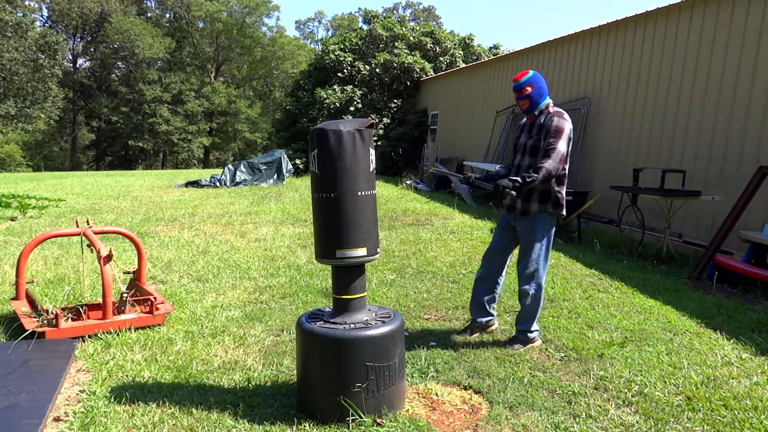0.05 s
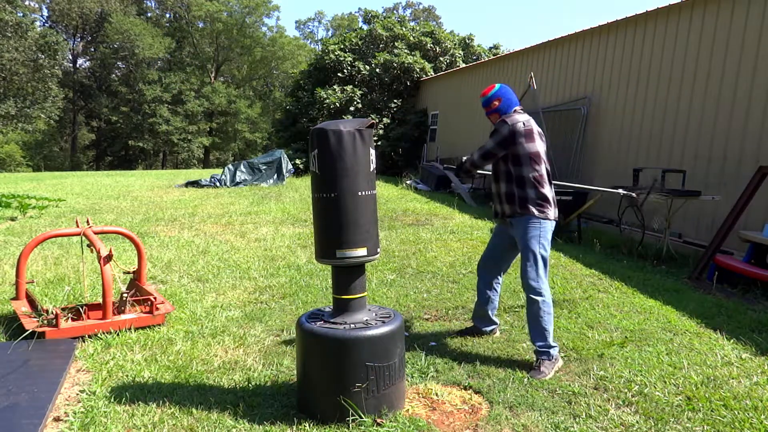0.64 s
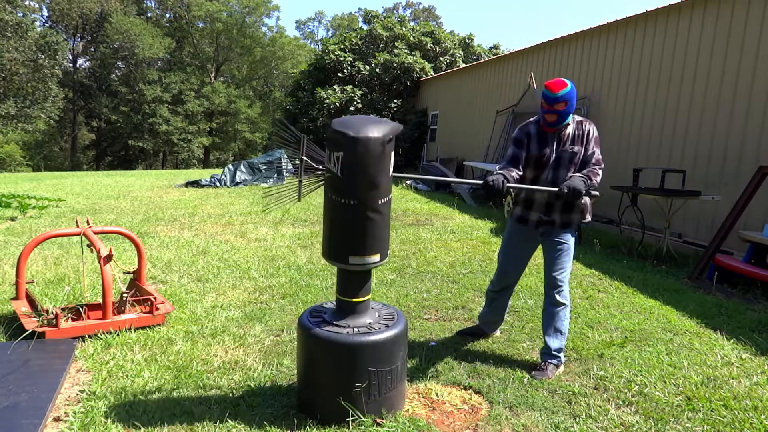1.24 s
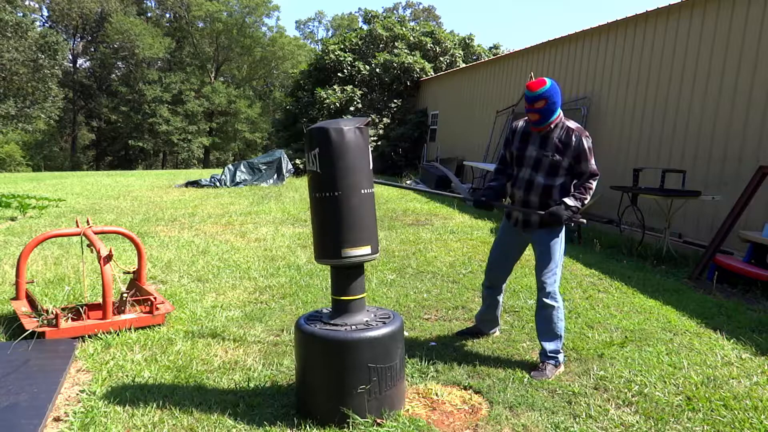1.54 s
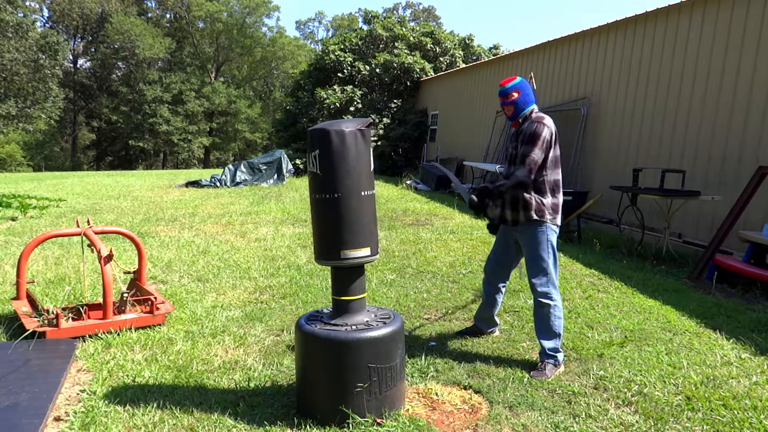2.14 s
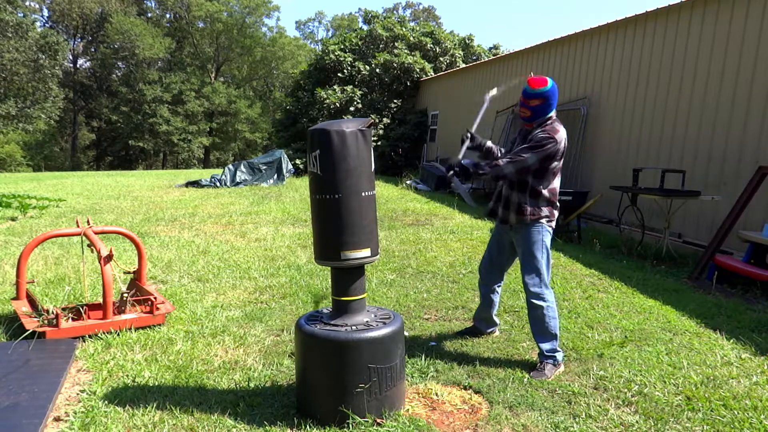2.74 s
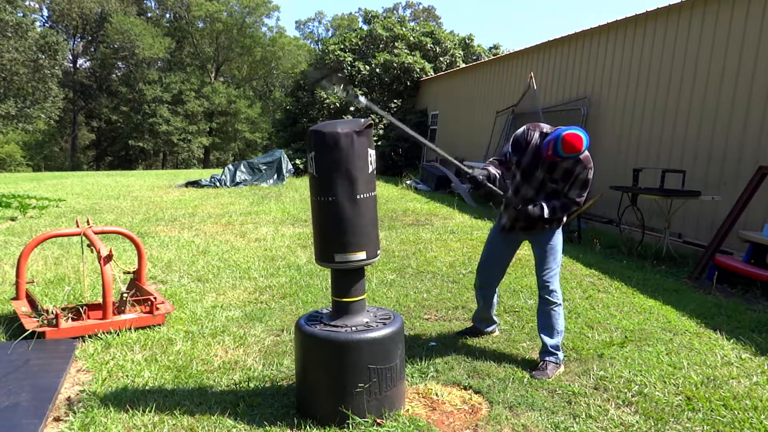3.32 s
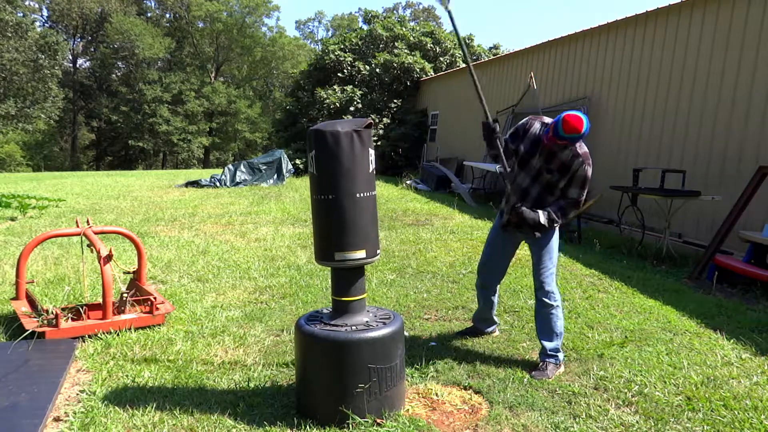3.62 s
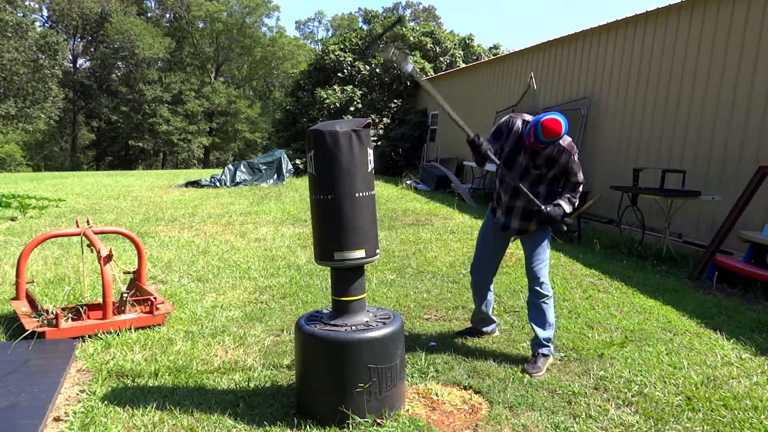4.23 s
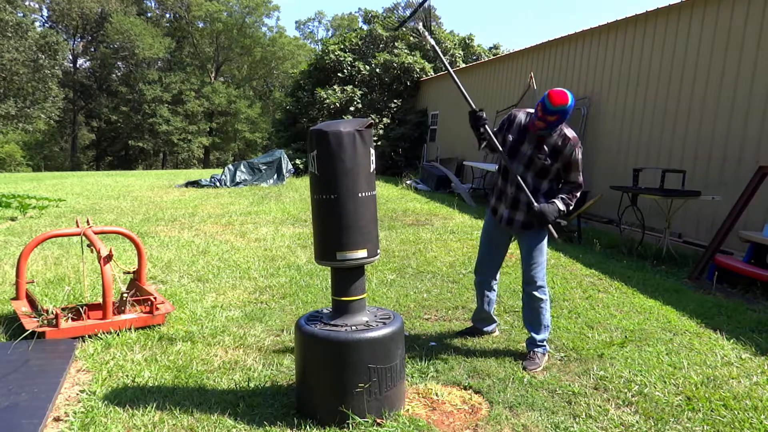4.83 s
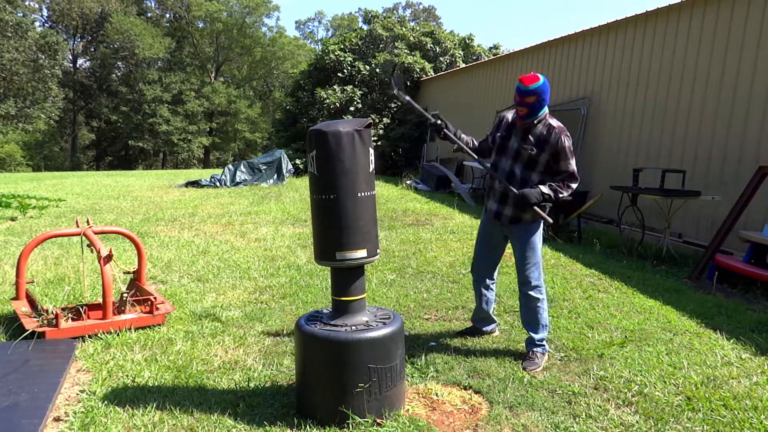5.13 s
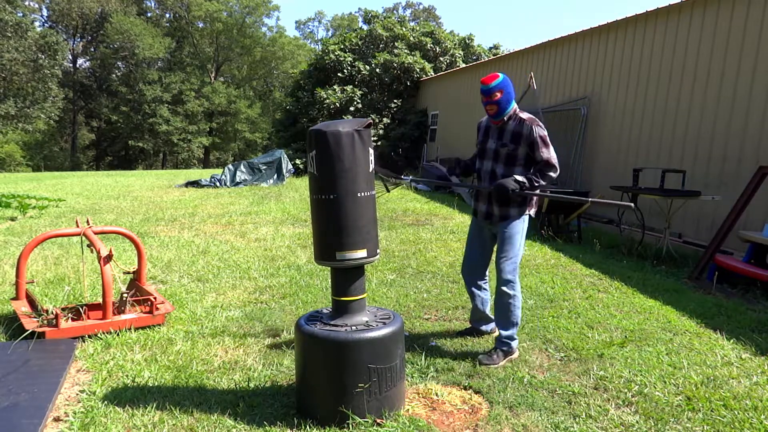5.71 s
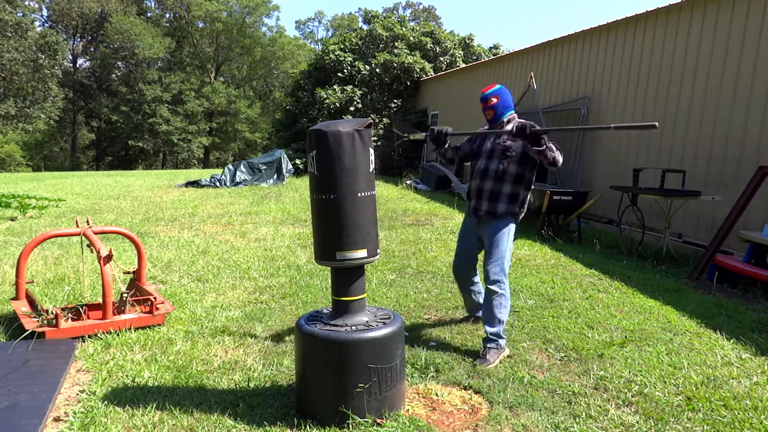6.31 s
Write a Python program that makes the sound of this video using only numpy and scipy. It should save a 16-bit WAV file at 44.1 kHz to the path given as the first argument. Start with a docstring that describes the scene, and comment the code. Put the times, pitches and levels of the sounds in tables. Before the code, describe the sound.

Three close, padded thuds with rattling metal rake tines on a lawn, while a far mower drones and insects buzz faintly.

```python
"""Three padded thuds and clashes of steel, close and ahead: a leaf rake hits a heavy bag on a lawn.
The vinyl slaps, the padding booms, and after the first blow the bag rocks in its freestanding base.
The springy tines clash, flap and rattle to rest; steps rustle in the grass and a shed wall answers.
Far from the microphone a mower drones under the breeze, insects buzz in the trees,
and a small bird sings twice among a few notes from other birds. A faint high whine runs throughout."""
import sys
import numpy as np
from scipy import signal
from scipy.fft import rfft, irfft, next_fast_len
from scipy.io import wavfile
from scipy.ndimage import map_coordinates

SR = 44100
rng = np.random.default_rng(int(sys.argv[2]) if len(sys.argv) > 2 else 0)


def wrap_up_sound(samples):
    """Save the sound to the file named by the first command line argument, as 16-bit audio."""
    columns = np.atleast_2d(samples).T
    # keep every value between -1 and 1, then stretch to whole-number steps
    tamed = np.clip(columns, -1, 1)
    steps = np.round(tamed * 32767).astype(np.int16)
    wavfile.write(sys.argv[1], SR, steps)


N = 284922

# Spectra. Each row: frequency in Hz, relative level per Hz in dB.
AIR_SPECTRUM = [(12, -70), (20, -35), (32, -15), (48, -13.5), (101, 1), (129, -8.5), (339, -18.5),
                (719, -19.5), (1280, -30), (1800, -29.5), (3300, -35.5), (4520, -33.5), (6500, -38),
                (8450, -64), (14300, -120)]  # far exhaust and breeze
INSECT_SPECTRUM = [(5500, -51), (6700, -18.5), (7150, 0), (7420, 3), (7800, -0.5), (8500, -9.5),
                   (10000, -22.5), (15500, -37)]  # buzz in the trees
RUSTLE_SPECTRUM = [(300, -10), (800, -4.5), (2200, 6), (4500, 4.5), (7000, 5), (15000, -5.5)]  # clothes and grass
SCUFF_SPECTRUM = [(600, -20.5), (1500, -8.5), (2600, -0.5), (3800, 2.5), (6000, -8.5), (12000, -33)]  # shoes and gloves
VINYL_SPECTRUM = [(25, -4), (60, 4.5), (200, -0.5), (450, 1.5), (800, -8.5), (1300, -11.5), (2200, -16.5),
                  (4000, -21.5), (9000, -36)]  # slap on the bag's cover
STEEL_SPECTRUM = [(290, -15), (500, -7.5), (640, -21.5), (831, -17), (1060, -14), (1140, -25),
                  (1900, -10.5), (2260, -7.5), (3150, -5), (4150, -3.5), (5970, -4.5), (9220, 4),
                  (12900, -10.5), (15100, -6.5), (16000, -23)]  # the rake's head
# The breeze. Each row: time in seconds, relative level in dB.
BREEZE_LEVELS = [(0, -54), (3, -53), (4.6, -52), (6.46, -49.5)]
# The far mower's blades. Each row: time in seconds, hum in Hz, gain in dB.
BLADE_RUN = [(0, 97.84, -6.5), (2.2, 98.1, -3.5), (3.1, 100.4, -6), (4, 100.4, -2.5), (5, 102, -1),
             (5.9, 102.4, 2.5), (6.46, 102.6, -3.5)]
# Their harmonics. Each row: multiple of the hum, level in dB before that gain.
BLADE_HARMONICS = [(1, -38.5), (1.63, -50.5), (2, -60.5), (3, -71.5)]
# The mower's engine. Each row: frequency in Hz, level in dB.
ENGINE_TONES = [(64.5, -51.5), (69, -55), (129.5, -51.5), (137.5, -60), (172.5, -62.5)]
# The small bird's song. Each row: start within it and length in seconds, first and last pitch in Hz,
# relative level in dB.
SONG_NOTES = [(0, 0.034, 6150, 6190, -41), (0.106, .062, 4370, 4990, -40),
              (0.236, 0.0664, 4180, 4780, -43.5), (0.377, .065, 4130, 4750, -42.5)]
# When it sings. Each row: start in seconds, gain in dB.
SONG_STARTS = [(.588, -2), (5.322, 1.5)]
# Other birds. Each row: start and length in seconds, first and last pitch in Hz, relative level in dB.
OTHER_BIRD_NOTES = [(0.575, .055, 6300, 8000, -40), (3.596, 0.094, 2140, 2070, -43),
                    (3.658, 0.26, 2060, 1915, -50)]
# Steps and lifts of the rake. Each row: peak time and half length in seconds, then relative levels
# in dB of rustle, tine rattle and scuff.
BODY_MOVES = [(0.277, 0.13, -50, -62, -65), (1.205, 0.057, -37, -47, -38.5),
              (1.716, 0.29, -45.5, -52.5, -52), (2.152, 0.13, -49.5, -66, -52),
              (2.733, 0.35, -59.5, -72, -63.5), (3.563, 0.27, -44.5, -53, -49),
              (4.014, 0.28, -58, -51.5, -52), (4.573, 0.19, -32, -42, -38), (5.018, 0.23, -42, -42, -42.5),
              (5.49, 0.32, -45, -50.5, -59), (6.136, 0.32, -55.5, -63, -66)]
# The shaft against hands and bag. Each row: start in seconds, level in dB, pitch in Hz, t60 in seconds.
SHAFT_CLACKS = [(1.426, -16.5, 1590, 0.021), (1.621, -44.5, 3500, .1), (1.695, -38, 3300, 0.13),
                (2.109, -40.5, 6260, 0.075), (2.271, -29.5, 4400, 0.01), (2.47, -36, 2530, 0.051),
                (3.884, -42, 3860, 0.1), (4.083, -39.5, 4120, 0.12)]
# Air round the shaft. Each row: peak time and rise in seconds, pitch in Hz, level in dB.
SHAFT_SWINGS = [(1.14, 0.058, 620, -44.5), (3.24, 0.095, 450, -48.5), (4.311, 0.11, 460, -47.5)]
# The rake lands. Each row: start in seconds, knock in Hz and dB, boom delay in seconds, boom in Hz
# and dB, slap and clash in dB, clash swell and t60 in seconds, relative tine ring in dB.
RAKE_BLOWS = [(1.157, 288, -8.5, 0.0077, 71.5, -11.5, -14.5, -23.5, 0.023, 1, -13),
              (3.260, 411, -13.5, .014, 137, -5.5, -15, -25, .0025, 0.82, 2),
              (4.324, 555, -19, 0.0087, 136.7, -6, -12.5, -22.5, .001, 0.93, -1)]
# Lighter contacts with the bag and its hollow base. Each row: start in seconds, level in dB,
# pitch in Hz, t60 in seconds, slap in dB.
BAG_BUMPS = [(1.314, -15.5, 116, 0.1, -19), (1.392, -18.5, 85.6, 0.35, -27),
             (1.424, -14.5, 129.5, 0.12, -14.5), (1.471, -19.5, 316, 0.034, -29.5),
             (3.493, -28.5, 442, 0.036, -34.5), (4.081, -54, 407, 0.021, -34.5),
             (4.422, -11, 335, 0.047, -21), (5.751, -33, 684, .048, -36)]
# The sprung tines flap to and fro. Each row: start in seconds, level in dB, cycle and back-swing delay
# in seconds, back-swing gain in dB, fall time and clash t60 in seconds, relative ring in dB.
TINE_FLAPS = [(1.211, -18.5, .103, .054, 2.5, .22, .2, -11), (3.311, -18, .1055, .072, -1, .43, .19, -1.5),
              (3.847, -38.5, .11, .05, -2, .33, .08, 1), (4.384, -19, .132, .066, 1.5, .26, .25, -1),
              (4.654, -15.5, .052, .025, -2.5, .08, .1, 5), (4.759, -30, .175, .077, 1, .55, .12, -2)]
# Bending modes of a tine. Each row: frequency in Hz, relative level in dB, t60 in seconds.
TINE_MODES = [(2922, 2, .15), (3061, 2, .12), (3270, 2, .12), (3392, 1, .1), (3700, 0, .1), (4100, -1, .1),
              (4830, -3, .1), (5600, -4, .1), (6540, -4, .1), (7715, -5, .08), (8400, -7, .08),
              (9300, -7, .08), (10100, -6, .08)]
# Single hard ticks of steel. Each row: start in seconds, relative level in dB.
STEEL_TICKS = [(1.264, -7), (1.282, 2), (1.333, 3), (1.380, 1), (2.772, -32), (2.93, -28), (3.082, -32),
               (3.3264, 4), (3.386, 0), (3.4368, -11), (3.4842, -2), (3.525, -3.5), (3.5942, -6),
               (3.663, -22), (3.686, -7), (4.654, 2), (4.838, -11.5), (4.99, -11), (5.185, -31)]
# The yard's echo. Each row: frequency in Hz, t60 in seconds.
YARD_DECAY = [(100, 0.12), (600, 0.41), (3000, 0.5), (12000, 0.1)]
# Stereo spread of near and far sounds at the microphone. Each row: frequency in Hz, side gain in dB.
NEAR_WIDTH = [(60, -20), (110, -20), (200, -12), (380, -13.5), (700, -12), (1290, -10), (2380, -35),
              (4400, -114), (8120, -24), (15000, -44)]
FAR_WIDTH = [(60, -25), (110, -33.5), (200, -12), (380, -5), (700, -5.5), (1290, -3), (2380, -6),
             (4400, -11.5), (8120, -14), (15000, -21)]

KNOCK_T60_S, BOOM_T60_S = 0.058, 0.088  # the cover knocks first, the padding booms after it
PUSH_HZ, PUSH_DB, PUSH_T60_S = 41, -31, 0.11  # the whole bag gives way and shoves the air
FOLLOW_S, FOLLOW_DB, FOLLOW_RATIO = 0.024, -2.5, 0.72  # the shaft follows through: a softer, lower knock
ROCK_START_S, ROCK_GAP_S = 1.613, 0.174  # the bag rocks, its post knocking in the base at each turn
ROCK_HZ, ROCK_DB, ROCK_LOSS_DB, ROCK_T60_S, ROCK_SLAP_DB = 450, -29, 2, 0.039, -6.5
FLAP_FALL_DB, FLAP_HOLD = 20, 1.82  # loss over the fall time; the exponent makes a flap hold, then drop
LOOSE_DB, LOOSE_RISE_S, LOOSE_T60_S = -16.5, 0.032, 1.06  # loose tines rattle on under each flap


def amp(db):
    """Decibels to gain."""
    return 10 ** (np.asarray(db) / 20)


def unit(x):
    """Scale to rms 1."""
    return x / np.sqrt(np.mean(x ** 2) + 1e-20)


def along(points, hz):
    """(Hz, value) points read on a log axis."""
    freqs, values = np.transpose(points)
    return np.interp(np.log(hz + 1), np.log(freqs + 1), values)


def curves(rows):
    """One value per sample for each column after the time."""
    times, *columns = np.transpose(rows)
    return [np.interp(np.arange(N) / SR, times, column) for column in columns]


def wobble(rate):
    """A smooth random curve, rate knots a second."""
    knots = rng.standard_normal(int(N * rate / SR) + 4)
    fine = np.arange(len(knots) * 10) / 10
    return np.interp(np.arange(N) * rate / SR, fine, map_coordinates(knots, [fine], mode="nearest"))


def add(track, s, sound):
    """Mix a sound into the track at s seconds."""
    start = max(round(s * SR), 0)
    track[start:start + len(sound)] += sound[:N - start]


def colour(x, points, size=8192):
    """Causal filter with a (Hz, dB) shape that keeps the power of white noise."""
    gain = amp(along(points, np.fft.rfftfreq(size, 1 / SR)))
    cepstrum = irfft(np.log(gain + 1e-6))
    cepstrum[1:size // 2] *= 2  # fold to minimum phase
    cepstrum[size // 2 + 1:] = 0
    response = irfft(np.exp(rfft(cepstrum)))
    return signal.oaconvolve(x, response / np.linalg.norm(response))[:len(x)]


def noise(points):
    """Coloured noise of rms 1."""
    return unit(colour(rng.standard_normal(N), points))


def fade(t, attack, t60):
    """A quick rise and an exponential decay of 60 dB in t60 seconds."""
    return (1 - np.exp(-t / attack)) * np.exp(-np.log(1000) * t / t60)


def contacts(rate, spread_db):
    """Random impulses of uneven size, rate a second, rms 1."""
    chance, size = rng.random((2, N))
    hits = np.flatnonzero(chance < rate / SR)
    polarity = np.sign(chance[hits] - rate / SR / 2)
    train = np.zeros(N)
    train[hits] = polarity * amp(spread_db * np.sqrt(12) * (size[hits] - 0.5))
    return unit(train)


def camera_whine(hz=11620, level_db=-69):
    """A thin, steady high tone, perhaps from the camera."""
    return amp(level_db) * np.sin(2 * np.pi * np.cumsum(hz + 12 * wobble(60)) / SR)


def air(level_db=7):
    """The broad rumble of distant exhaust and breeze."""
    return amp(curves(BREEZE_LEVELS)[0] + level_db + 2.07 * wobble(6)) * noise(AIR_SPECTRUM)


def mower(waver_db=1.5, drift=0.00527):
    """Far off, blade and engine tones beat against each other as the blades slowly pick up speed."""
    def tone(hz, db):
        peak = np.sqrt(2) * amp(db + waver_db * wobble(8.1))
        cycles = np.cumsum(hz * (1 + drift * wobble(6.4))) / SR
        return peak * np.sin(2 * np.pi * (cycles + rng.random()))

    blade_hz, gain_db = curves(BLADE_RUN)
    blades = sum(tone(k * blade_hz, db + gain_db) for k, db in BLADE_HARMONICS)
    engine = sum(tone(hz, db) for hz, db in ENGINE_TONES)
    return blades + engine


def insects(level_db=-51, stroke_hz=133):
    """A narrow buzz in the trees, pulsed by fast strokes and a throb at every fifth."""
    phase = 2 * np.pi * stroke_hz * np.cumsum(1 + 0.0029 * wobble(2.9)) / SR
    strokes = 1 + 0.3 * np.sin(phase)
    throbs = 1 + 0.17 * (np.sin(phase / 5) + np.cos(2 * phase / 5))
    return amp(level_db + 1.9 * wobble(2.01)) * unit(noise(INSECT_SPECTRUM) * strokes * throbs)


def birds(quaver=0.218):
    """One bird twice sings a thin note and three rising slurs; others add a chirp and a falling whistle."""
    out, flutter = np.zeros(N), quaver * wobble(250)
    notes = [(start + s, length, first_hz, last_hz, db + gain_db)
             for start, gain_db in SONG_STARTS for s, length, first_hz, last_hz, db in SONG_NOTES]
    for s, length, first_hz, last_hz, db in notes + OTHER_BIRD_NOTES:
        progress = np.linspace(0, 1, int(length * SR))
        glide = progress + flutter[int(s * SR):][:len(progress)]
        pitch = first_hz + (last_hz - first_hz) * glide  # wide slurs are the least steady
        envelope = amp(db) * np.sin(np.pi * progress) ** 2
        add(out, s, envelope * np.sin(2 * np.pi * np.cumsum(pitch) / SR))
    return out


def yard_echo(x, delay_s=0.018):
    """Scatter from the shed wall and the trees; each frequency dies at its own speed."""
    hz, t, spectrum = signal.stft(rng.standard_normal(SR // 2), SR, nperseg=256)
    decay = np.exp(-np.log(1000) * t / along(YARD_DECAY, hz)[:, None])
    tail = signal.istft(spectrum * decay, SR, nperseg=256)[1]
    delayed = np.pad(x, (int(delay_s * SR), 0))
    return signal.fftconvolve(delayed, tail / np.linalg.norm(tail))[:N]


def movement():
    """Strength of the rustle, the rattle and the scuff: each move swells and fades."""
    t = np.arange(N) / SR
    power = sum(np.outer(amp(levels) ** 2, np.exp(-2 * ((t - s) / half) ** 2))
                for s, half, *levels in BODY_MOVES)
    return np.sqrt(power)


def handling(rustle_db=-3, scuff_db=-3):
    """Close by, clothes and grass rustle, shoes and gloves scuff, and the shaft clacks in the grip."""
    rustle, _, scuff = movement() * amp(2.4 * wobble(40))
    out = rustle * amp(rustle_db) * colour(contacts(4000, spread_db=3), RUSTLE_SPECTRUM)
    out += scuff * amp(scuff_db) * colour(contacts(700, spread_db=7.5), SCUFF_SPECTRUM)
    t = np.arange(SR // 6) / SR
    for s, db, hz, t60 in SHAFT_CLACKS:
        burst = rng.standard_normal(len(t)) * fade(t, 0.00048, t60)
        band = [(hz / 4, -18), (hz / 2, -4), (hz, 0), (hz * 2, -10), (hz * 4, -22)]
        add(out, s, amp(db) * colour(burst, band))
    return out


def swish(q=5):
    """Eddies shed by the shaft give a soft narrow whoosh just before each blow."""
    out, t = np.zeros(N), np.arange(SR) / SR - 0.5
    for s, rise, hz, db in SHAFT_SWINGS:
        eddies = unit(signal.lfilter(*signal.iirpeak(hz, q, SR), rng.standard_normal(SR)))
        add(out, s - 0.5, amp(db) * np.exp(-(t / rise) ** 2) * eddies)
    return out


def thuds(rocks=3):
    """Every contact with the bag, in rows like BAG_BUMPS: the bumps, the blows and the rocking post."""
    rows = list(BAG_BUMPS)
    for s, knock_hz, knock_db, lag, boom_hz, boom_db, slap_db, *_ in RAKE_BLOWS:
        rows += [(s, knock_db, knock_hz, KNOCK_T60_S, slap_db),
                 (s, PUSH_DB, PUSH_HZ, PUSH_T60_S, -np.inf),
                 (s + lag, boom_db, boom_hz, BOOM_T60_S, -np.inf),
                 (s + FOLLOW_S, knock_db + FOLLOW_DB, knock_hz * FOLLOW_RATIO,
                  KNOCK_T60_S, slap_db + FOLLOW_DB)]
    for k in range(rocks):
        db = ROCK_DB - k * ROCK_LOSS_DB
        hz = ROCK_HZ * np.exp(0.17 * rng.normal())
        rows.append((ROCK_START_S + k * ROCK_GAP_S, db, hz, ROCK_T60_S, db + ROCK_SLAP_DB))
    return rows


def bag(attack_cycles=0.44, squeeze=0.1, relax_s=0.0045, slap_t60=0.092):
    """Contacts slap the vinyl and push a damped boom out of the padding; its pitch sags as it relaxes."""
    boom, slap, t = np.zeros(N), np.zeros(N), np.arange(SR // 2) / SR
    for s, db, hz, t60, slap_db in thuds():
        phase = 2 * np.pi * np.cumsum(hz * (1 + squeeze * np.exp(-t / relax_s))) / SR
        add(boom, s, amp(db) * fade(t, attack_cycles / hz, t60) * np.sin(phase))  # deep ones build slowly
        add(slap, s, amp(slap_db) * fade(t, 0.0027, slap_t60))
    return boom + colour(slap * rng.standard_normal(N), VINYL_SPECTRUM)


def tine_click(scrape_db=-2):
    """A touch of steel on steel: a click and a short scrape."""
    t = np.arange(SR // 40) / SR
    scrape = rng.standard_normal(len(t)) * fade(t, 0.0001, 0.008)
    click = (t == 0) + amp(scrape_db) * scrape / np.linalg.norm(scrape)
    return click / np.linalg.norm(click)


def tine_ring(mistune=0.024, scatter_db=2):
    """One tine rings in its bending modes, out of tune with its neighbours."""
    t = np.arange(SR // 7) / SR
    ring = np.zeros(len(t))
    for hz, db, t60 in TINE_MODES:
        envelope = amp(db + scatter_db * rng.normal() - 60 * t / t60)
        pitch = hz * (1 + mistune * rng.normal())
        ring += envelope * np.sin(2 * np.pi * (pitch * t + rng.random()))
    return ring / np.linalg.norm(ring)


def settling():
    """Strength of the loose rattle that each flap leaves behind."""
    power, t = np.zeros(N), np.arange(2 * SR) / SR
    for s, db, *_ in TINE_FLAPS:
        add(power, s, (amp(db + LOOSE_DB) * fade(t, LOOSE_RISE_S, LOOSE_T60_S)) ** 2)
    return np.sqrt(power)


def clashes(swell_s=0.0013, cycles=5):
    """The tines clash once as a blow lands, then twice in each dying flap cycle."""
    rows = [(s, db, swell, t60, ring_db) for s, *_, db, swell, t60, ring_db in RAKE_BLOWS]
    for s, db, cycle, back_lag, back_db, fall_time, t60, ring_db in TINE_FLAPS:
        for k in range(cycles):
            for age, level in [(k * cycle, db), (k * cycle + back_lag, db + back_db)]:
                loss_db = FLAP_FALL_DB * (age / fall_time) ** FLAP_HOLD
                rows.append((s + age, level - loss_db, swell_s, t60, ring_db))
    return rows


def rake(tines=6, clash_rate=560, rattle_rate=32, touch_db=12, tick_db=2, flutter_db=4, ring_db=-8):
    """Tine strikes tine: densely in each clash, sparsely as the head settles or is carried."""
    clash_power, ring_power, steel = np.zeros((3, N))
    t = np.arange(SR // 3) / SR
    for s, db, swell, t60, clash_ring_db in clashes():
        surge = fade(t, swell, t60)
        surge = amp(db) * surge / surge.max()
        add(clash_power, s, surge ** 2)
        add(ring_power, s, (amp(clash_ring_db) * surge) ** 2)
        suddenness = np.exp(-swell / 0.0015)  # a sudden clash opens with one hard touch
        add(steel, s, amp(db + touch_db) * suddenness * tine_click())
    force, ring_force = np.sqrt(clash_power), np.sqrt(ring_power)
    _, carried, _ = movement()
    shake = np.hypot(settling(), carried) * amp(flutter_db * wobble(55))
    for _ in range(tines):
        shower = contacts(clash_rate, spread_db=4)
        rattle = shake * contacts(rattle_rate, spread_db=1.5)
        clicks = signal.oaconvolve(force * shower + rattle, tine_click())
        rings = signal.oaconvolve(ring_force * shower + rattle, tine_ring())
        steel += (clicks[:N] + amp(ring_db) * rings[:N]) / np.sqrt(tines)
    for s, db in STEEL_TICKS:
        add(steel, s, amp(db + tick_db) * tine_click(scrape_db=10))
    return colour(steel, STEEL_SPECTRUM)


def side_signal(x, width):
    """The difference between two close microphone ports: a quarter cycle off, strongest in the mids."""
    size = next_fast_len(N + SR // 4)
    gain = amp(along(width, np.fft.rfftfreq(size, 1 / SR)))
    return irfft(rfft(x, size) * -1j * gain, size)[:N]


def scene(bird_db=-3, wall_db=-17, trees_db=-7, diffuse_db=-9):
    """The microphone faces the bag across the lawn; echoes and breeze arrive from all sides."""
    near = bag() + rake() + handling() + swish()
    song = amp(bird_db) * birds()
    background = song + mower() + camera_whine() + insects()
    mid = near + yard_echo(amp(wall_db) * near + amp(trees_db) * song) + background + air()
    side = side_signal(near + amp(diffuse_db) * yard_echo(near), NEAR_WIDTH)
    side += side_signal(background + air(), FAR_WIDTH)
    return np.array([mid + side, mid - side])


def record(dry, ceiling=0.73, hardness=5, top_hz=15900):
    """The camera rounds off the highest peaks and keeps nothing above its band limit."""
    rounded = dry / (1 + np.abs(dry / ceiling) ** hardness) ** (1 / hardness)
    size = next_fast_len(N + SR // 4)
    passband = np.fft.rfftfreq(size, 1 / SR) < top_hz
    return irfft(rfft(rounded, size) * passband, size)[:, :N]


dry = scene()
out = record(dry)
wrap_up_sound(out)
```